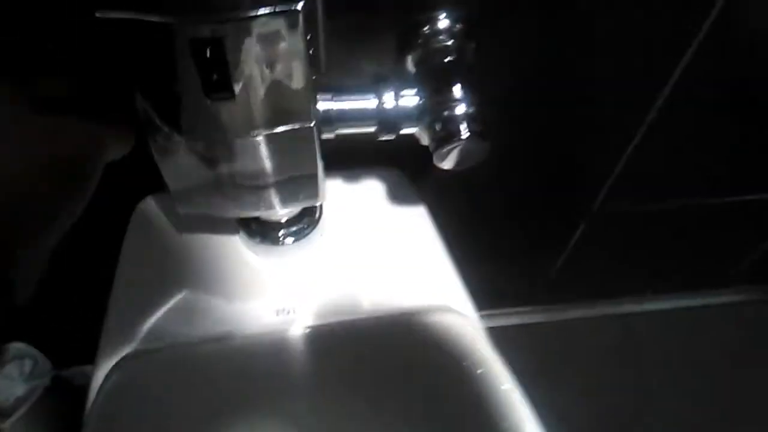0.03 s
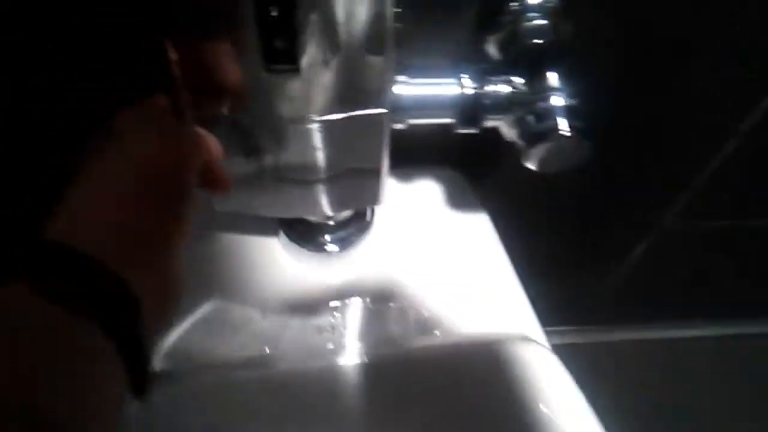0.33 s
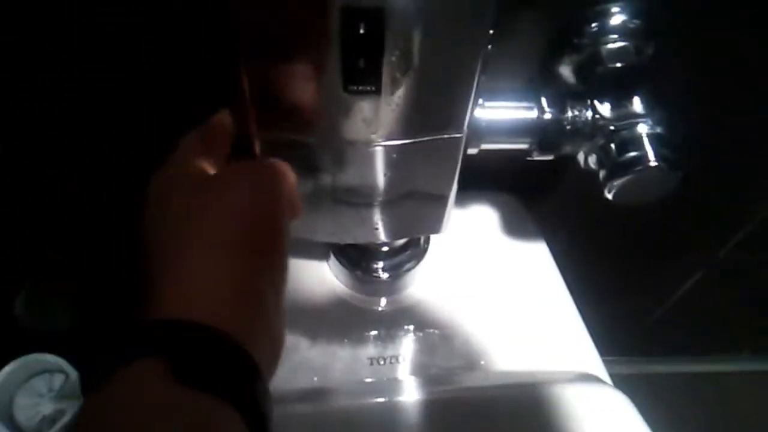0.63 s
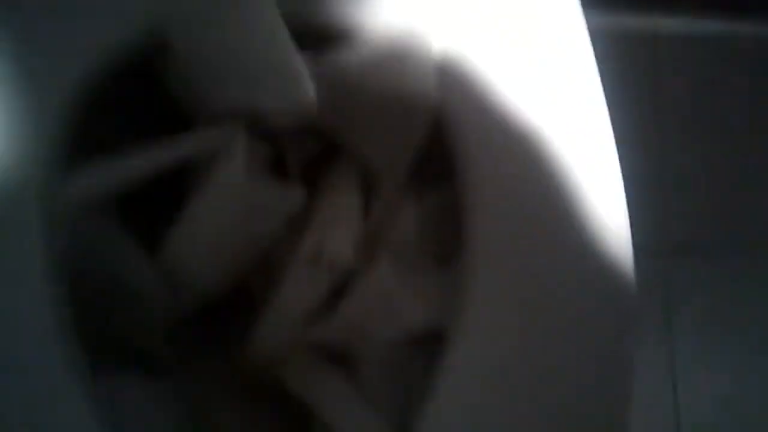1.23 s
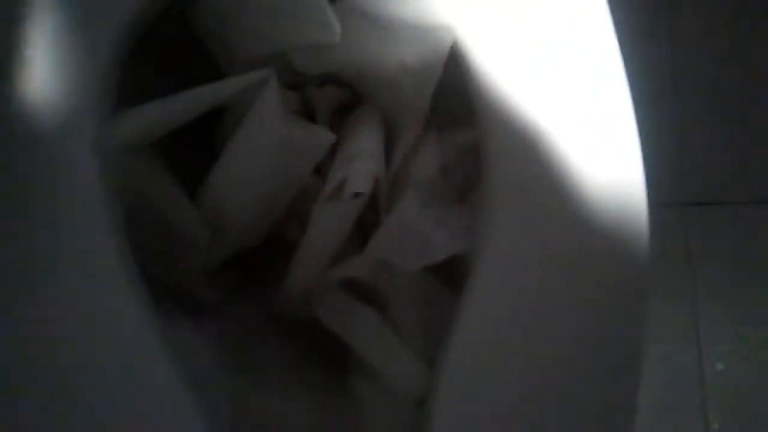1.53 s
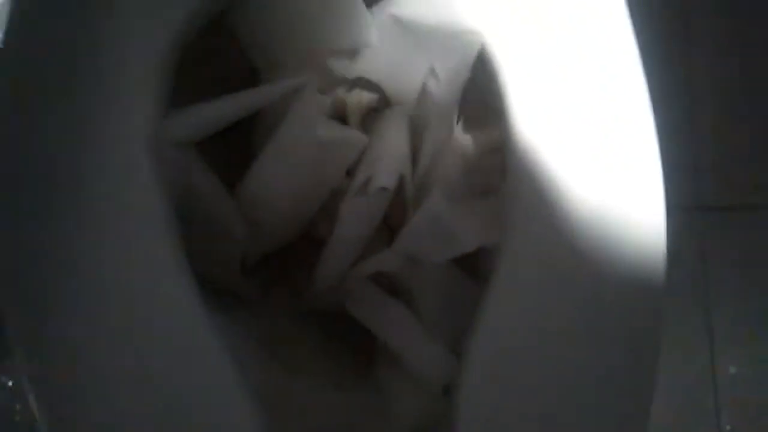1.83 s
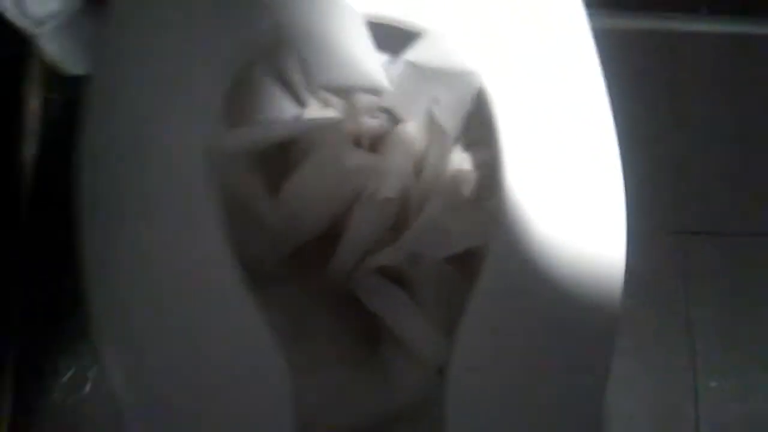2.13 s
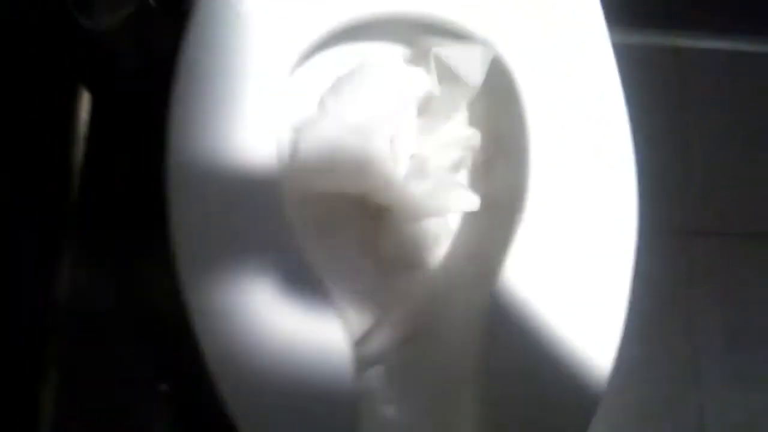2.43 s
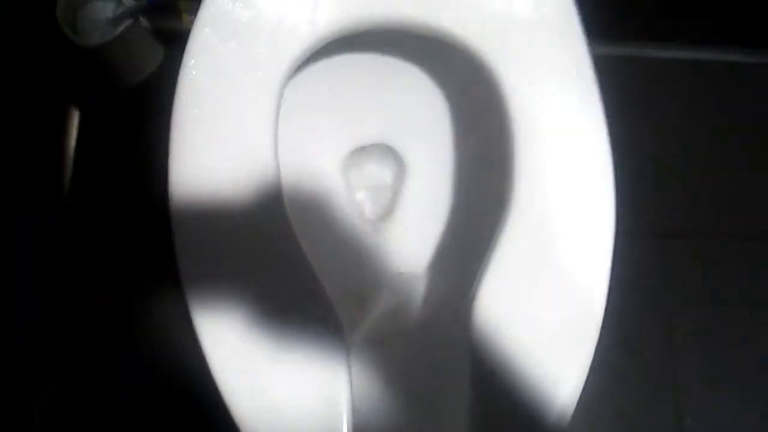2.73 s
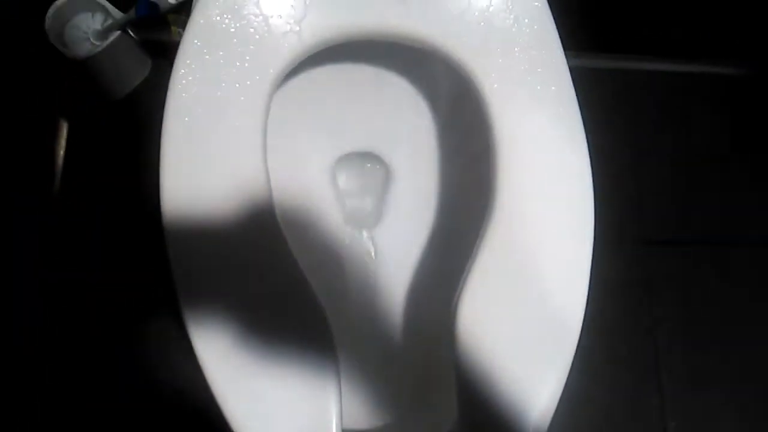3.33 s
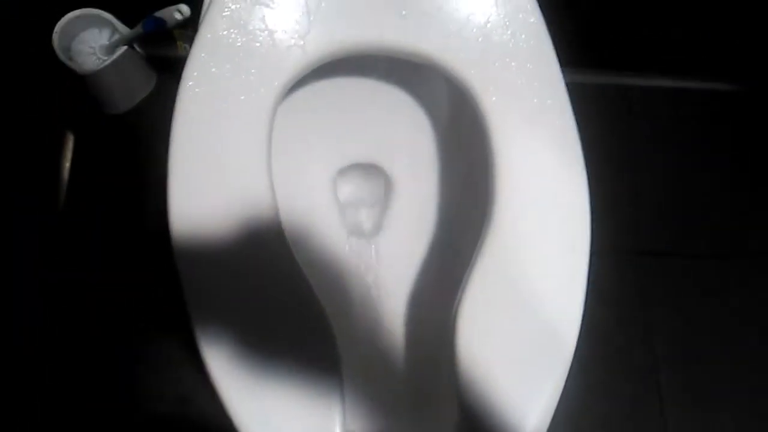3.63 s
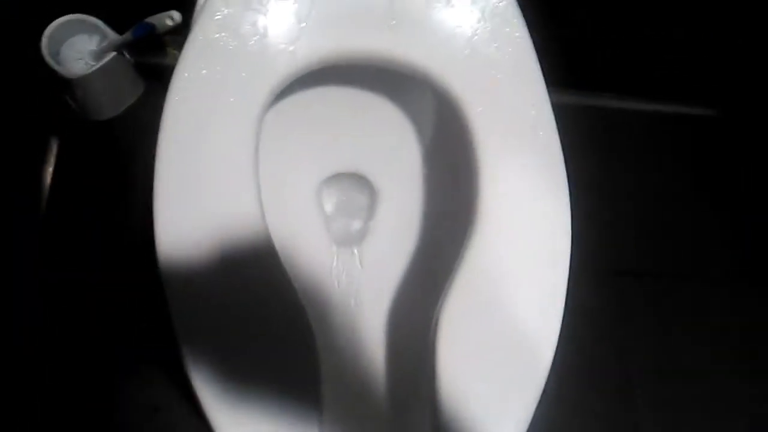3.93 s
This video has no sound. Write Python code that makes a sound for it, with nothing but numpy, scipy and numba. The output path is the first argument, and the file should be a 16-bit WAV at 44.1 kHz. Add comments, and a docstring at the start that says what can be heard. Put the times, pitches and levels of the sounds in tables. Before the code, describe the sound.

A toilet flushes, close up in a small tiled restroom. At first there is only a low drone and a faint pipe hiss that fades by 1 second. At about 1.7 seconds the valve knocks open, then hisses and whistles while bubbles glug in the bowl. From 2.6 seconds water roars loudly on the porcelain and the drain slurps air, easing slightly but still running at 4 seconds.

```python
"""A small tiled restroom with a flush-valve toilet. Over a low room drone, a faint pipe hiss dies away.
The valve knocks open and whistles, and air bubbles glug through the full bowl. As it empties, the rim
jets roar on the bare porcelain and the drain slurps air. Bowl and tiles ring with the water, and the
close microphone's limiter holds down the loudest rush."""
import sys
import numpy as np
from scipy import signal
from scipy.fft import rfft, irfft
from scipy.io import wavfile
from scipy.ndimage import uniform_filter1d, minimum_filter1d
from numba import njit

SR = 44100
rng = np.random.default_rng(int(sys.argv[2]) if len(sys.argv) > 2 else 0)


def inscribe(sig):
    """Save sig as 16-bit PCM at rate SR to the path in sys.argv[1].

    A 1-D sig is mono; a 2-D sig holds one channel per row.
    Samples are clipped to [-1, 1] before scaling.
    """
    pcm = np.round(np.clip(np.atleast_2d(sig).T, -1, 1) * 32767)
    wavfile.write(sys.argv[1], SR, pcm.astype(np.int16))


N = 176400

# Levels are set ahead of the bowl, the room and the mix gains.
# pipe hiss before the flush: time_s, level_db
PIPE_LEVEL = [(0,-55.5),(.25,-53.5),(.42,-55.5),(.6,-62.5),(1.1,-80)]
# swells of low rumble: peak_s, width_s, level_db
RUMBLES = [(0.54,0.033,-30.5),(1.592,0.03,-32),(1.715,0.027,-27),(1.84,0.074,-29),(2.313,0.07,-24)]
# swells of soft hum: peak_s, width_s, pitch_hz, level_db
HUMS = [(0.505,0.069,122,-33),(0.848,0.12,215.5,-48),(0.947,0.052,130.6,-37.5),(1.26,0.076,218.7,-45)]
# handling rustles: start_s, decay_s, level_db
RUSTLES = [(1.115,0.13,-65),(1.505,0.27,-60)]
# envelopes of the flush: time_s, level_db
CHURN_LEVEL = [(1.62,-51),(1.66,-38),(1.76,-36),(1.87,-22),(1.93,-33.5),(2.0,-21.5),(2.15,-21.5),(2.28,-27.5),(2.43,-19),(2.6,-21),(2.85,-23.5),(3.25,-21),(3.6,-33.5),(4,-29)]  # deep in the bowl
BUBBLING_LEVEL = [(1.63,-53),(1.69,-41),(1.93,-36),(2.0,-31.5),(2.12,-28.5),(2.35,-31),(2.47,-21.5),(2.61,-25.5),(2.645,-13.5),(2.9,-26.5),(3.25,-19),(3.6,-25),(4,-32)]  # under the surface
VALVE_LEVEL = [(1.632,-70),(1.647,-45),(1.675,-43),(1.69,-44),(1.76,-49.5),(1.853,-42.5),(1.868,-24.5),(2.1,-28),(2.4,-28),(2.7,-36.5),(4,-54)]  # hiss of the valve
SPLASH_LEVEL = [(1.9,-56),(2.1,-34),(2.41,-36.5),(2.45,-24),(2.615,-28.5),(2.635,-19),(2.76,-11.5),(2.82,-10.5),(3.14,-11),(3.23,-15.5),(3.42,-21),(3.7,-20.5),(4,-19)]  # water on bare porcelain
SPRAY_LEVEL = [(2.2,-47),(2.6,-28.5),(2.7,-22.5),(2.84,-16.5),(3.1,-21.5),(3.25,-25.5),(3.7,-27),(3.85,-24),(4,-29.5)]  # fine drops
RIM_LEVEL = [(1.93,-46),(1.975,-25),(2.2,-25.5),(2.38,-37.5),(2.55,-33),(2.8,-44)]  # hollow note of the rim channel
# the valve's two whistles: time_s, pitch_hz, level_db
LOW_WHISTLE = [(1.66,3060,-105),(1.683,3050,-26),(1.75,3060,-38),(1.852,2980,-40),(1.885,2880,-17),(1.978,2906,-14.5),(2.008,2949,-24),(2.22,2970,-40),(2.7,2930,-56)]
HIGH_WHISTLE = [(1.85,5730,-52),(1.875,5820,-31),(1.981,5850,-32.5),(2.02,5894,-23.5),(2.058,6220,-19),(2.112,6525,-13),(2.202,6670,-22.5),(2.39,6746,-36.5),(2.8,6800,-54)]
# resonances of the valve body: pitch_hz, width_hz, over_hiss_db
VALVE_MODES = [(6720,130,-3),(8550,420,-12),(12430,160,-14.5)]
# big air bubbles: start_s, pitch_hz, level_db
GLUGS = [(1.777,355,-11),(1.836,347,-8.5),(1.868,270,-4),(1.97,358,-8),(1.998,332,-1),(2.057,345,-6),(2.36,337,-2.5),(2.426,342,-2.5),(2.443,326,-3),(2.478,379,-4),(2.573,343,-4.5)]
# air sucked through the water: peak_s, width_s, pitch_hz, width_hz, level_db
SLURPS = [(2.81,0.025,1882,600,-13),(3.053,0.077,1520,256,-14),(3.168,0.011,1050,91.5,-14),(3.265,0.028,952,248,-18.5),(3.497,0.011,1482,178,-12),(3.603,0.009,2820,450,-21),(3.877,0.013,2564,550,-12)]
# narrow resonances of the bowl and the stall around it: pitch_hz
BOWL_MODES = [275,339,382,560,699,754,817,1039,1174,1362,1674,2245]
# tone colour of each layer: frequency_hz, gain_db
PIPE_EQ = [(200,-11),(345,9),(450,-2),(670,6),(1100,-7),(1950,-12),(2350,0.5),(3300,-15.5),(5400,-13.5),(5900,-21),(6600,-10),(7600,-10.5),(9400,-15.5),(13000,-31)]
DRONE_EQ = [(20,-20),(42,-22),(60,-3),(73,4),(90,-15.5),(120,-2.5),(165,-18.5),(280,-29),(700,-42.5),(4000,-64),(14000,-67)]
RUMBLE_EQ = [(25,-24),(45,-39),(68,9.5),(90,-10),(118,3),(170,-12.5),(300,-23.5),(900,-72)]
RUSTLE_EQ = [(700,5),(1200,-5),(2500,-9),(4000,-26)]
CHURN_EQ = [(60,-33),(170,-19),(240,-4),(280,-2),(340,0),(390,-12),(460,-9.5),(800,-43),(2000,-60)]
BUBBLING_EQ = [(300,-31),(500,-7.5),(630,0),(740,-2),(900,-1.5),(1100,-6.5),(1300,-17.5),(3000,-45)]
VALVE_EQ = [(300,11),(900,-7),(1500,4),(3000,8.5),(3500,-1),(4400,4.5),(5200,-1),(5800,3),(7600,3),(10400,1),(11200,-2),(14000,-5.5)]
KNOCK_EQ = [(300,-16),(1000,7),(3000,6),(4800,3.5),(7000,-7),(14000,-21)]
SPLASH_EQ = [(150,-22),(450,-15.5),(700,-12.5),(920,-4.5),(1040,1.5),(1150,0.5),(1240,-15),(1370,1.5),(1590,0),(1720,-5.5),(2000,-8),(2250,-3.5),(3200,-8.5),(3800,-16.5),(6000,-20),(14000,-44)]
SPRAY_EQ = [(1200,-28),(3000,-4.5),(7900,-6.5),(10000,-9.5),(11500,-16.5),(14000,-19.5)]
# stereo lean of the valve and the water: frequency_hz, left_minus_right_db
VALVE_PAN = [(600,-0.5),(2900,4),(7000,3.5),(12000,-5.5)]
WATER_PAN = [(200,-0.5),(1100,1),(2200,4.5),(4000,3.5),(6000,0.5),(8000,7),(10500,1),(13000,-3)]

TIME_S = np.arange(N) / SR
FREQ_HZ = np.maximum(np.arange(N // 2 + 1) * SR / N, 1)


def undb(db):
    return 10 ** (np.asarray(db) / 20)


def unit(x):
    return x / np.sqrt(np.mean(x ** 2))


def curve(rows, column=1):
    """One column of a table, joined by straight lines in time."""
    rows = np.array(rows)
    return np.interp(TIME_S, rows[:, 0], rows[:, column])


def fader(rows, column=1):
    """Gain from a level column; silent before its first row."""
    return undb(curve(rows, column)) * (TIME_S >= rows[0][0])


def swell(peak_s, width_s):
    """A bell-shaped rise and fall."""
    return np.exp(-.5 * ((TIME_S - peak_s) / width_s) ** 2)


def eq_gains(eq):
    """Gain at every frequency of an EQ curve."""
    hz, db = np.array(eq).T
    return undb(np.interp(np.log(FREQ_HZ), np.log(hz), db))


def colour(x, eq):
    """A sound through an EQ curve, at unit level."""
    return unit(irfft(rfft(x) * eq_gains(eq), N))


def wander(rate_hz):
    """Smooth random drift of unit spread."""
    return unit(irfft(rfft(rng.standard_normal(N)) * np.exp(-(FREQ_HZ / rate_hz) ** 2), N))


def noise(widen_hz=2220):
    """Stereo noise, centred in the bass and wide in the treble."""
    mid, side = rfft(rng.standard_normal((2, N)))
    side = side * (0.03 + 0.8 * FREQ_HZ / np.hypot(FREQ_HZ, widen_hz))
    return unit(irfft(np.array([mid + side, mid - side]), N))


def whistle(hz, width_hz):
    """Turbulence ringing in a narrow resonance whose pitch may move."""
    band = 1 / np.sqrt(1 + (2 * FREQ_HZ / width_hz) ** 2) / (1 + (FREQ_HZ / width_hz / 2) ** 4)
    flutter = irfft(rfft(rng.standard_normal((2, 2, N))) * band, N)
    phase = 2 * np.pi * np.cumsum(hz + np.zeros(N)) / SR
    return unit(flutter[0] * np.cos(phase) + flutter[1] * np.sin(phase))


@njit
def bubble_tones(start_fraction, hz, cycles, strength, lag_s, glide):
    """Decaying, rising bubble tones, each with its own lag between left and right."""
    out = np.zeros((2, N))
    for k in range(len(hz)):
        first, length = int(start_fraction[k] * N), int(cycles[k] * SR / hz[k]) + 2
        omega = 2 * np.pi * hz[k] / SR
        step = np.exp(1j * omega - 5 / length)  # one sample of spin and decay
        bend = np.exp(1j * omega * glide / length)
        right_shift = np.exp(1j * omega * lag_s[k] * SR)
        tone = strength[k] + 0j
        for i in range(first, min(N, first + length)):
            attack = min(1., (i - first + 1) * omega / 3)
            out[0, i] += attack * tone.imag
            out[1, i] += attack * (tone * right_shift).imag
            tone *= step
            step *= bend
    return out


def bubbles(low_hz, high_hz, cycles, spread_db, glide, count, max_lag_s=0.00017):
    """An even-spectrum stream of bubbles of scattered pitch and strength."""
    start, pitch, life, size, side = rng.random((count, 5)).T
    hz = low_hz * (high_hz / low_hz) ** pitch
    strength = hz * undb(-spread_db * np.log(0.0055 + size))
    return unit(bubble_tones(start, hz, cycles * (.5 + life), strength, max_lag_s * (2 * side - 1), glide))


def pipe_hiss(lean_left_db=6):
    """A faint hiss in the pipe dies away before the flush."""
    pan = undb(np.array([[lean_left_db], [-lean_left_db]]) / 2)
    return colour(noise(), PIPE_EQ) * fader(PIPE_LEVEL) * pan


def room_tone(drone_db=-42):
    """A low drone with swells of rumble and soft hum."""
    out = colour(noise(), DRONE_EQ) * undb(drone_db)
    out += colour(noise(), RUMBLE_EQ) * sum(undb(db) * swell(at, width) for at, width, db in RUMBLES)
    for peak_s, width_s, hz, db in HUMS:
        out += undb(db) * swell(peak_s, width_s) * np.sin(2 * np.pi * hz * TIME_S + 0.22 * wander(5.5))
    return out


def rustles(attack_s=0.014):
    """Faint brushes of handling: each rises quickly and dies away."""
    envelope = 0
    for start_s, decay_s, db in RUSTLES:
        age = np.maximum(TIME_S - start_s, 0)
        envelope += undb(db) * (1 - np.exp(-age / attack_s)) * np.exp(-age / decay_s)
    return colour(noise(), RUSTLE_EQ) * envelope * undb(2.5 * wander(60))


def gurgle():
    """Large bubbles churn in the trap and smaller ones boil above it."""
    deep = bubbles(155.6, 595, cycles=16.2, spread_db=1, glide=0.21, count=1500) + undb(-23) * noise()
    upper = bubbles(398, 1467, cycles=8.2, spread_db=1.5, glide=0.078, count=2400) + undb(-29) * noise()
    churn = colour(deep, CHURN_EQ) * fader(CHURN_LEVEL)
    return churn + colour(upper, BUBBLING_EQ) * fader(BUBBLING_LEVEL)


def valve_hiss(fade_start_s=2.3, fade_db_per_s=36):
    """Water hisses through the valve and, at full pressure, rings its body."""
    full_pressure = TIME_S >= HIGH_WHISTLE[0][0]
    body = sum(undb(db) * whistle(hz, width_hz) for hz, width_hz, db in VALVE_MODES)
    body *= full_pressure * undb(-fade_db_per_s * np.maximum(TIME_S - fade_start_s, 0))
    return (colour(noise(), VALVE_EQ) + body) * fader(VALVE_LEVEL) * undb(2.3 * wander(47))


def valve_whistle(rows, width_hz):
    """The flow sings in the valve on a sliding, slightly unsteady pitch."""
    hz = curve(rows) * (1 + 0.00395 * wander(32.0))
    return whistle(hz, width_hz) * fader(rows, column=2)


def valve_knock(start_s=1.679, knock_decay_s=0.0066, inrush_decay_s=0.47):
    """The valve snaps open and water rushes in behind it."""
    age = np.maximum(TIME_S - start_s, 0)
    knock = undb(-23.5) * np.exp(-age / knock_decay_s)
    inrush = undb(-36.5) * np.exp(-age / inrush_decay_s)
    return colour(noise(), KNOCK_EQ) * (knock + inrush) * (age > 0)


def glugs(attack_s=0.003, decay_s=0.0072, glide_per_s=1.8):
    """The biggest air bubbles ring singly, each a short, rising note."""
    out = 0
    for start_s, hz, db in GLUGS:
        age = np.maximum(TIME_S - start_s, 0)
        envelope = (1 - np.exp(-(age / attack_s) ** 2)) * np.exp(-age / decay_s)
        out += undb(db) * envelope * np.sin(2 * np.pi * hz * age * (1 + glide_per_s * age / 2))
    return out


def splash():
    """Jets break up on the porcelain: bubbles ring and spray crackles, surging together."""
    body = bubbles(304, 6000, cycles=30.5, spread_db=3, glide=0.12, count=20000) + undb(-3.5) * noise()
    drops = bubbles(2200, 12600, cycles=3, spread_db=4, glide=0.11, count=16000) + undb(6) * noise()
    surge = undb(1.5 * wander(47))
    roar = colour(body, SPLASH_EQ) * fader(SPLASH_LEVEL)
    spray = colour(drops, SPRAY_EQ) * fader(SPRAY_LEVEL) * undb(1.66 * wander(110))
    return (roar + spray) * surge


def rim_hoot():
    """The rim channel sounds a hollow note as it fills."""
    return unit(whistle(hz=636, width_hz=48).mean(axis=0)) * fader(RIM_LEVEL)


def slurps():
    """The drain sucks air through the water in short, pitched gulps."""
    out = 0
    for peak_s, width_s, hz, width_hz, db in SLURPS:
        air = whistle(hz, width_hz)
        centred = unit(air + 2 * air.mean(axis=0))
        out += undb(db) * swell(peak_s, width_s) * centred
    return out


def bowl(water, width_hz=8.9, ring_db=-3):
    """All the water in the bowl rings the same narrow resonances."""
    modes = sum(undb(ring_db) / (1 + 2j * (FREQ_HZ - hz) / width_hz) for hz in BOWL_MODES)
    return irfft(rfft(water) * (1 + modes), N)


def place(x, pan, left_delay_s=.00009):
    """A source reaches the two microphone ports with its own balance, the left slightly late."""
    lean = np.sqrt(eq_gains(pan))
    delay = np.exp(-2j * np.pi * FREQ_HZ * left_delay_s)
    return irfft(rfft(x) * np.array([lean * delay, 1 / lean]), N)


def tiles(x, t60_s=0.52, wet_db=-1.5):
    """Direct sound plus the short, bright ring of the tiled stall."""
    tail = noise() * undb(-60 * TIME_S / t60_s) * (TIME_S > .003)
    tail /= np.sqrt(np.sum(tail ** 2) / 2)
    wet = undb(wet_db)
    return (x + wet * signal.fftconvolve(x, tail, axes=1)[:, :N]) / np.hypot(1, wet)


def scene():
    """Valve and bowl sound in the tiled stall, over the quiet room."""
    valve = valve_hiss()
    valve += valve_whistle(LOW_WHISTLE, width_hz=150) + valve_whistle(HIGH_WHISTLE, width_hz=280)
    plumbing = valve + rim_hoot() + valve_knock()
    water = bowl(undb(-1.5) * (gurgle() + glugs()) + splash() + slurps())
    flush = place(plumbing, VALVE_PAN) + place(water, WATER_PAN)
    flushing = TIME_S >= CHURN_LEVEL[0][0]
    return undb(2) * tiles(flush * flushing) + pipe_hiss() + room_tone() + rustles()


def record(dry, threshold=1.38, release_s=0.022, top_hz=14200):
    """A limiter ducks the loudest rush, stray peaks clip, and a steep low-pass trims the top."""
    window = int(release_s * SR / 2)
    gain = np.minimum(1, threshold / (np.abs(dry).mean(axis=0) + 1e-9))
    smooth_gain = uniform_filter1d(minimum_filter1d(gain, window), window)
    limited = np.clip(dry * smooth_gain, -1, 1)
    return signal.sosfilt(signal.ellip(10, .2, 70, top_hz, fs=SR, output="sos"), limited)


dry = scene()
out = record(dry)
inscribe(out)
```